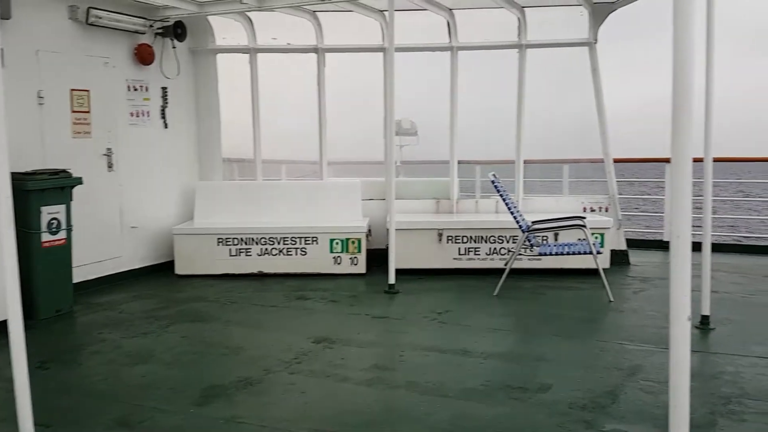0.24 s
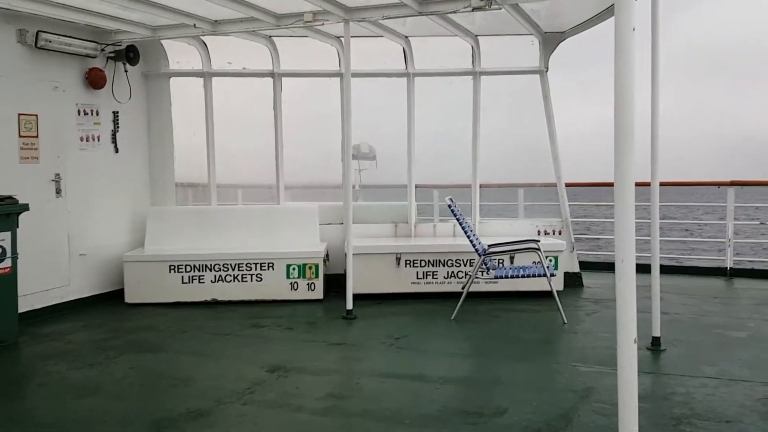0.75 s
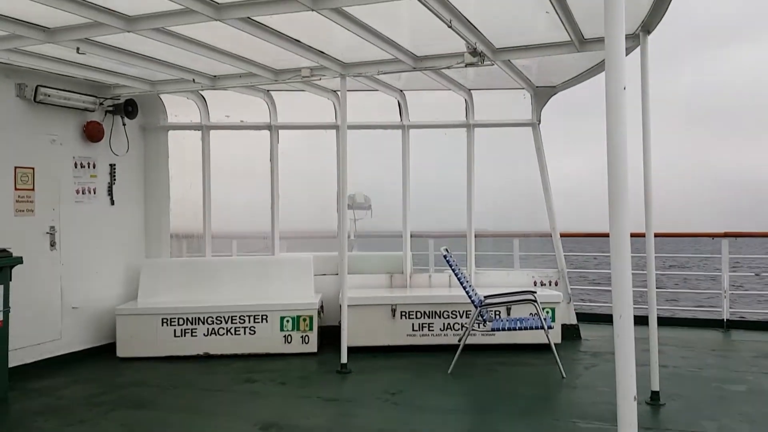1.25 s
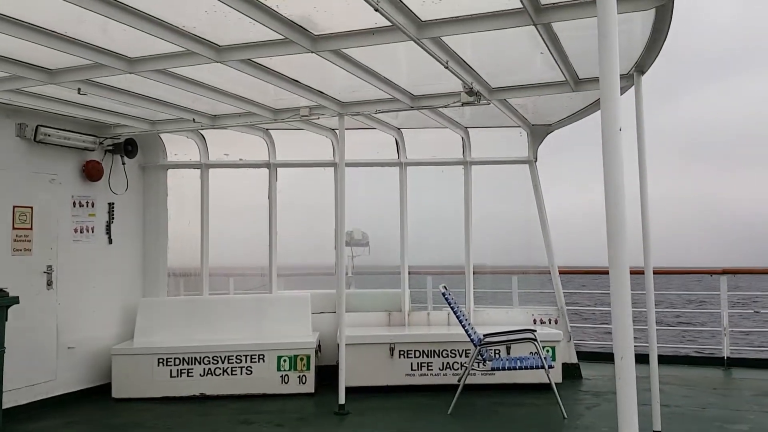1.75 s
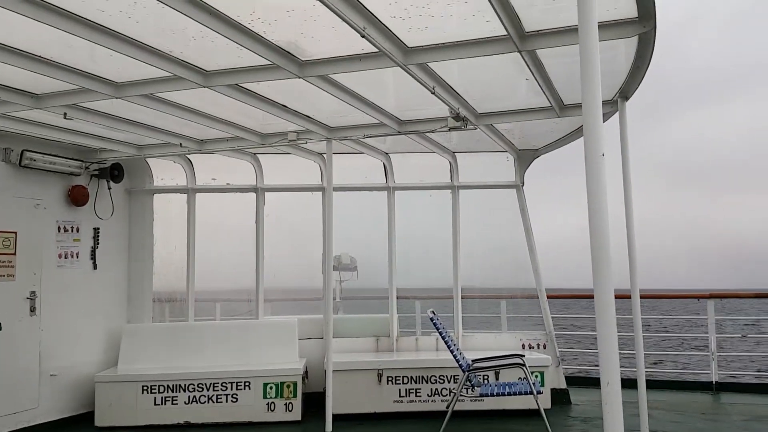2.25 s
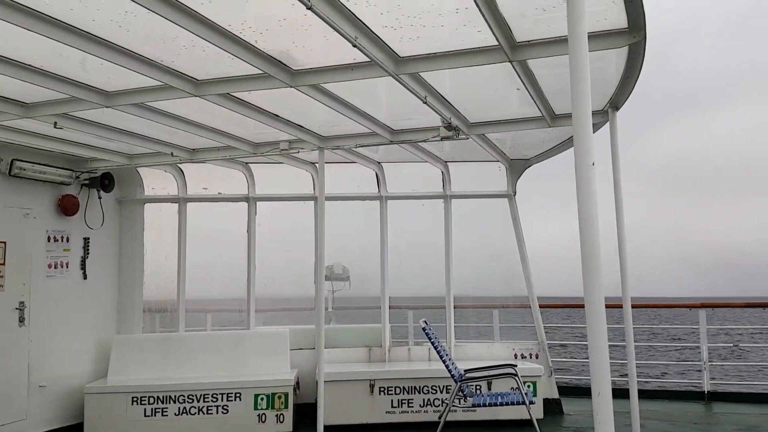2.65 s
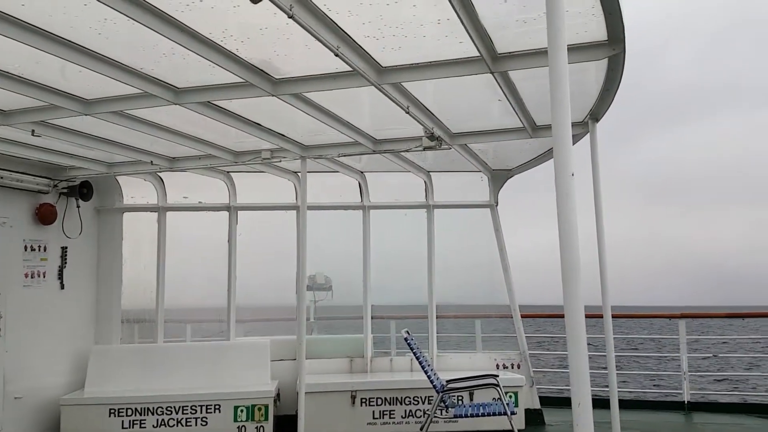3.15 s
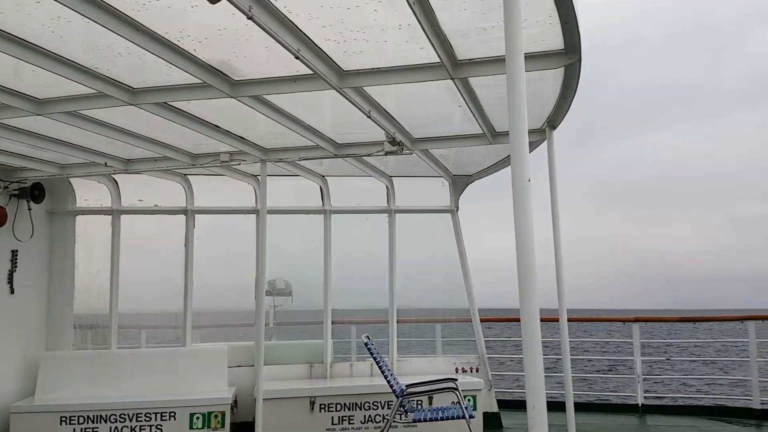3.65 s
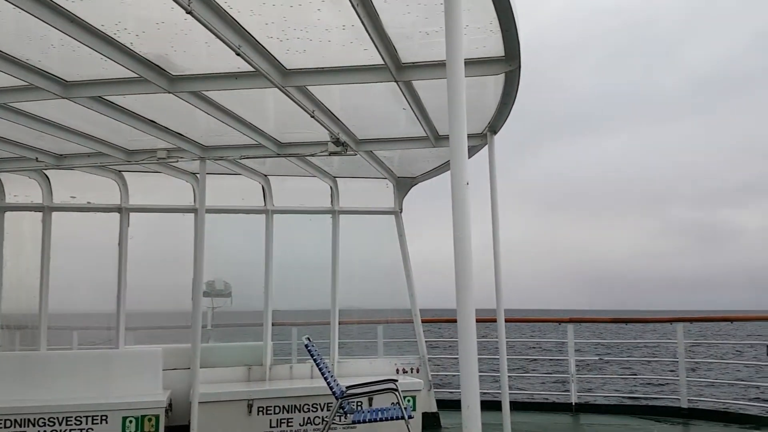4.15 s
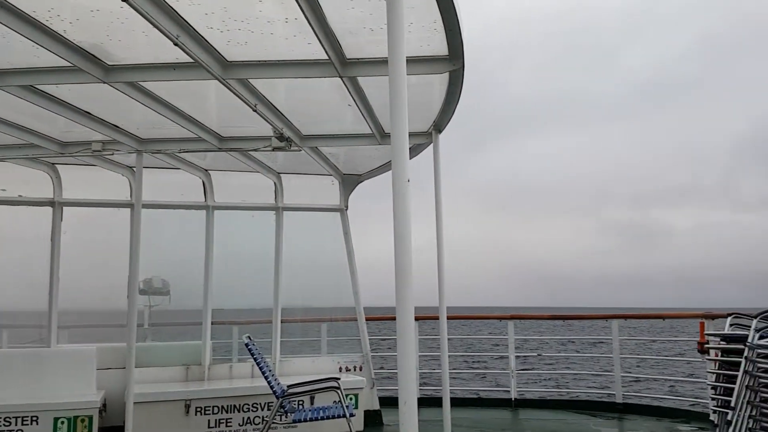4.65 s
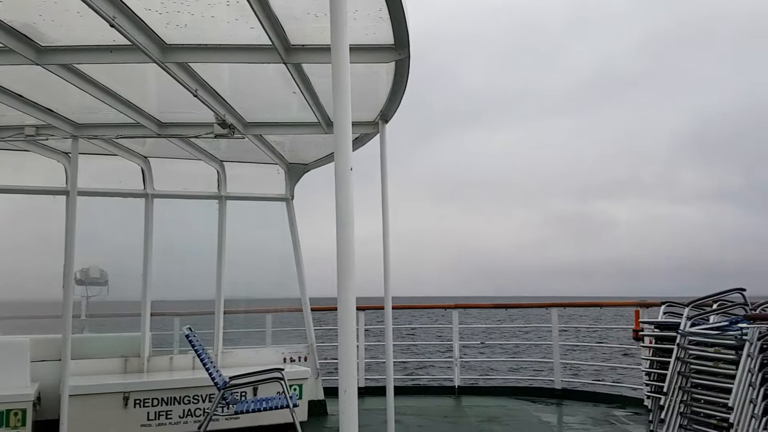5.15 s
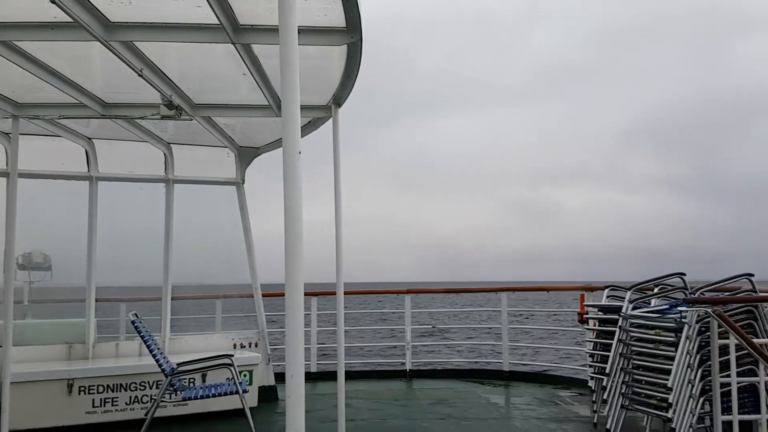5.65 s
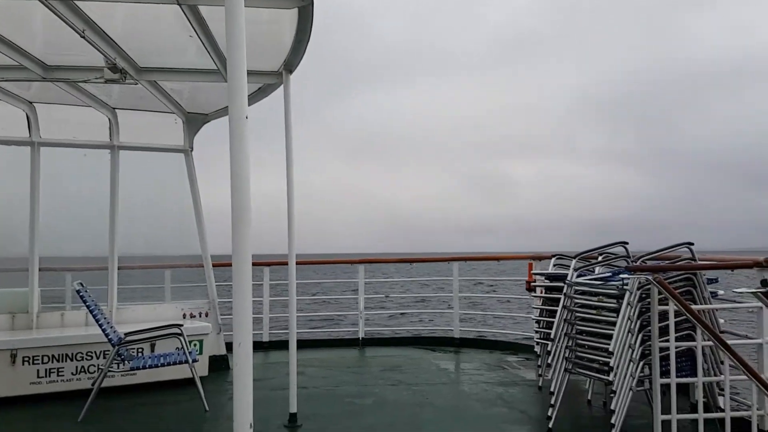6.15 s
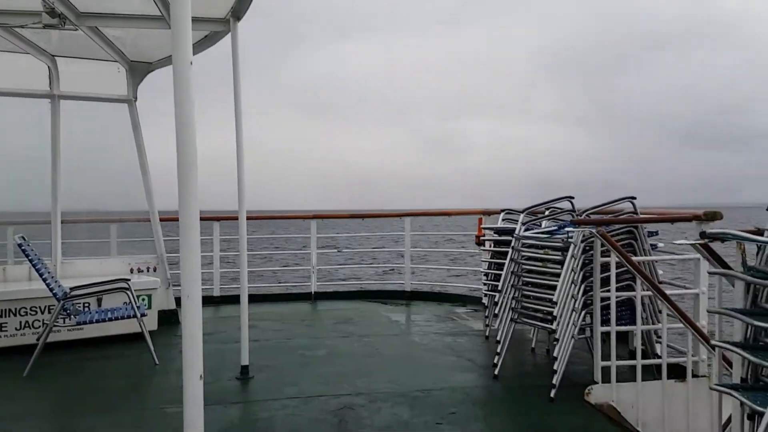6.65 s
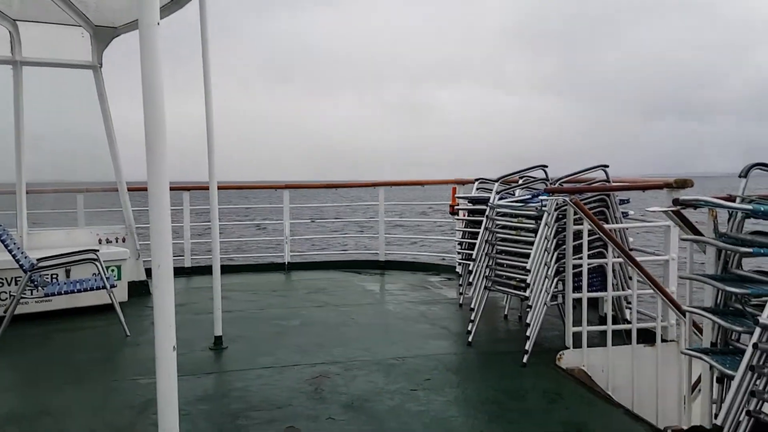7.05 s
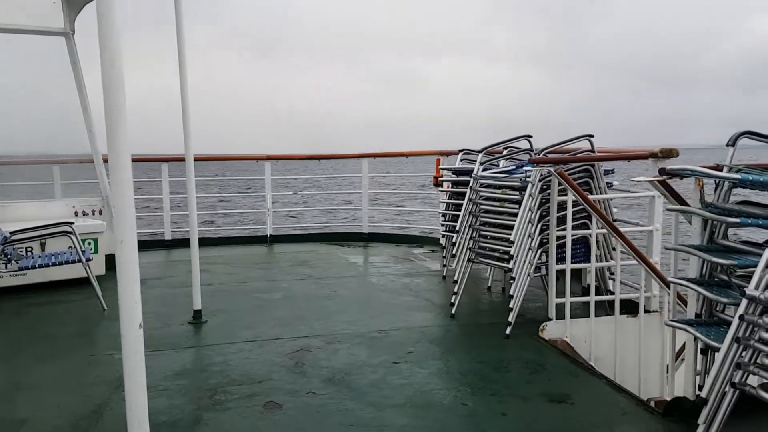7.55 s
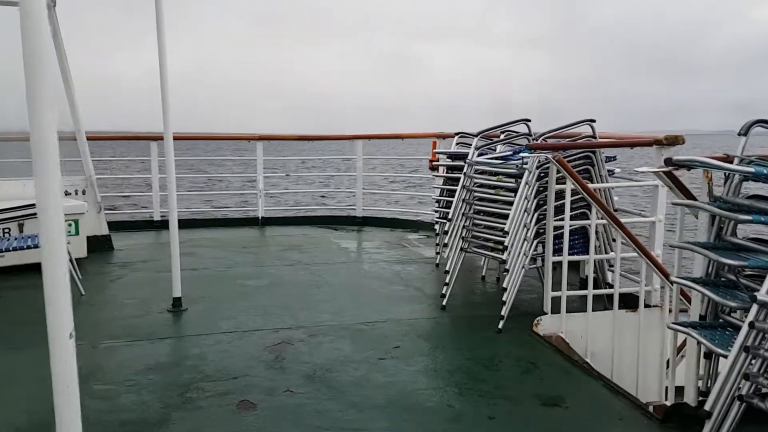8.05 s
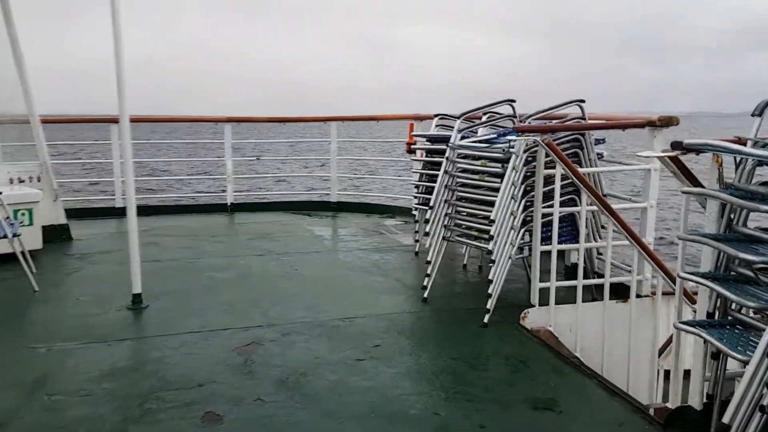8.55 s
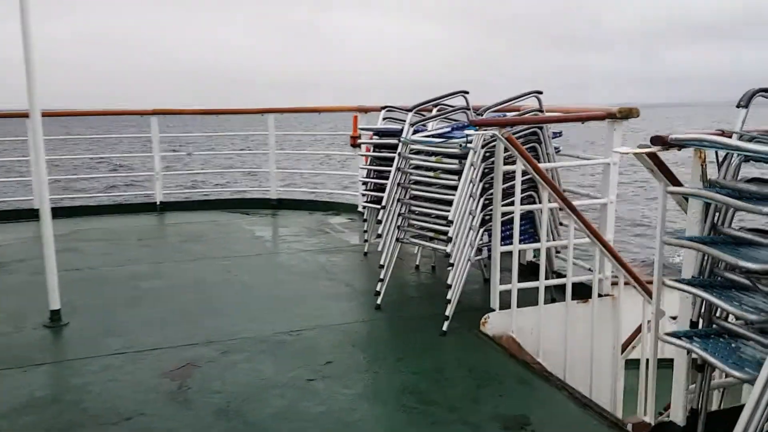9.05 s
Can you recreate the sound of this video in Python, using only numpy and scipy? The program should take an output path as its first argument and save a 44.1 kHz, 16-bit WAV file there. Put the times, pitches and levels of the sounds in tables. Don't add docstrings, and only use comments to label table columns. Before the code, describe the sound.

A large ship's diesel drones from start to finish, about nine and a half seconds: a dense, deep hum strongest around 60 to 80 hertz, with a buzzing upper layer, a slow beating throb and gentle swells as the listener moves beneath a roof. Around it lie a soft, wide rush of wind and ventilation, low wind buffeting, and faint wake and spray hiss growing slightly brighter. A barely audible scuff opens the scene. From 1.1 s, tiny dry, bright gear ticks occur irregularly, near and slightly right, until 5.1 s. A quick puff of wind slaps past at 4.8 s. More ticks come at 6.3 s and cluster from 7.1 to 7.6 s with faint dragging. At 8.45 s a rubber sole gives a very short, high, falling, chattering squeak and scuff; at 9.28 s a heel slips with a sharp little snap. The close stereo pickup has a short canopy reflection.

```python
import sys
import numpy as np
from scipy import signal
from scipy.fft import rfft, irfft, next_fast_len
from scipy.io import wavfile
from scipy.ndimage import uniform_filter1d, map_coordinates

SR = 44100
rng = np.random.default_rng(int(sys.argv[2]) if len(sys.argv) > 2 else 0)


def transcribe(signal):
    frames = np.atleast_2d(signal).T
    limited = np.clip(frames, -1, 1)
    pcm = np.round(limited * 32767).astype(np.int16)
    wavfile.write(sys.argv[1], SR, pcm)


def nominal_scale(level):
    x = np.asarray(level, float) / 20
    return 10 ** x


N = 410130
T = np.arange(N) / SR


def unit(x):
    return x / np.sqrt(np.mean(x ** 2) + 1e-20)


def along(points, hz):
    f, v = np.transpose(points)
    return np.interp(np.log(hz + 1), np.log(f + 1), v)


def curves(rows):
    s, *columns = np.transpose(rows)
    return [np.interp(T, s, column) for column in columns]


def wobble(rate_hz):
    knots = rng.standard_normal(int(N * rate_hz / SR) + 4)
    return map_coordinates(knots, [T * rate_hz])


def filtered(x, response):
    m = next_fast_len(N + SR // 2)
    return irfft(rfft(x, m) * response(np.fft.rfftfreq(m, 1 / SR)), m)[..., :N]


def rush(spectrum, patchy_db):
    z = signal.stft(rng.standard_normal((2, N)), nperseg=512)[2]
    field = rng.standard_normal(z.shape[1:])
    field = uniform_filter1d(field, size=6, axis=0)
    field = uniform_filter1d(field, size=14, axis=1)
    pair = signal.istft(z * nominal_scale(patchy_db * unit(field)), nperseg=512)[1][:, :N]
    closed = [(spectrum[0][0] / 2, -120), *spectrum, (spectrum[-1][0] * 2, -120)]
    return unit(filtered(pair, lambda hz: nominal_scale(along(closed, hz))))


def levels(layers, control_db):
    return [db + share * control_db + turn * (T - T.mean()) for db, share, turn in layers]


CYCLE_HZ = 3.2766
# multiple of the engine cycle, level in dB rms.
ENGINE_TONES = [(7, -39.0), (8, -39.3), (9, -48.9), (10, -40.3), (11, -38.6), (12, -41.7), (13, -44.1),
                (14, -30.9), (15, -35.3), (16, -46.8), (17, -29.4), (18, -31.0), (19, -27.2), (20, -24.9),
                (21, -34.4), (23, -34.7), (24, -23.3), (25, -30.7), (26, -29.4), (27, -31.6), (28, -34.6),
                (30, -44.5), (31, -41.0), (32, -44.8),
                (38, -41.0), (39, -39.9), (41, -37.4), (42, -28.2), (43, -37.5), (44, -31.6), (45, -29.3),
           (46, -39.8), (48, -32.2), (49, -38.9), (50, -37.2), (53, -39.7), (55, -44.2), (57, -43.8),
           (58, -41.1), (60, -38.2), (61, -31.9), (62, -45.1), (63, -39.5), (64, -43.8), (66, -36.7),
           (73, -41.4), (76, -45.2), (77, -40.5), (78, -42.6), (79, -41.0), (80, -46.7), (88, -45.5),
           (92, -47.5), (95, -46.2)]
# frequency in Hz, level in dB rms.
PUMPS = [(76.55, -29), (98.8, -39.5), (53.4, -44)]
# frequency in Hz, density in dB per Hz.
ROAR = [(20, -64.5), (38, -57), (56, -43.5), (65, -38), (71, -49), (78, -38.5), (104, -41.5), (113, -44),
        (147, -38.5), (172, -45), (200, -45.5), (230, -49), (260, -48), (340, -56)]
# time in seconds, lift of the funnel note in dB.
STANDING = [(0, 1.5), (.4, 1), (.8, -2.5), (1.2, 1), (1.9, 0), (2.4, -.5), (2.8, 0), (3.4, -3), (3.9, 1.5),
            (4.3, -1), (4.7, 1.5), (5.1, -1), (5.8, 1.5), (6.6, -2.5), (7.3, 3), (7.8, -1), (8.6, -2),
            (9.3, -3)]
# level in dB, share of the standing wave, change in dB per s while turning seaward.
DRONE = [
    (-24, 0.23, -0.24),
    (-17, 1.1, 0.12),
    (-20.5, -0.2, 0.16),
    (-24, .1, -0.32),
]


def engine():
    shaft = 2 * np.pi * CYCLE_HZ * T + 0.023 * wobble(1.2)
    tones = np.zeros((2, N))
    for order, db in ENGINE_TONES:
        waver = 0.0044 * order * wobble(2.5)
        for way, start in enumerate(rng.uniform(0, 2 * np.pi, size=2)):
            level = nominal_scale(db + 0.028 * order * wobble(1.5)) * np.sqrt(2)
            tones[way] += level * np.sin(order * shaft + waver + start)
    for hz, db in PUMPS:
        level = nominal_scale(db + 2.4 * wobble(0.96)) * np.sqrt(2)
        tones += level * np.sin(2 * np.pi * hz * T + 0.22 * wobble(1.7))
    drone = tones + nominal_scale(-22.0) * rush(ROAR, patchy_db=2.5)
    edges_hz = [0, 59, 108, 176, SR]
    bands = [filtered(drone, lambda hz: (hz >= lo) & (hz < hi)) for lo, hi in zip(edges_hz, edges_hz[1:])]
    bands_db = levels(DRONE, *curves(STANDING))
    return sum(nominal_scale(db) * unit(band) for db, band in zip(bands_db, bands))


# frequency in Hz, width in Hz, t60 in seconds.
GEAR_MODES = [
    (9960, 350, 0.032),
    (5500, 3500, .028),
    (8300, 900, .035),
    (13200, 4500, .032),
]
# start in seconds, knock in dB, ring in dB, upper modes in dB.
KNOCKS = [(1.1462, -61.5, -6, -9.5), (1.8083, -59, -6.5, -5), (2.0344, -66, -3, -1),
          (2.5468, -55.5, -0.5, -1.5), (2.9446, -60, -2.5, -8.5), (3.2846, -58.5, -5.5, -2),
          (4.479, -60.5, -3, -5), (4.7593, -57.5, 5, 2.5), (4.9372, -63.5, 2, -5), (5.1165, -58, 1.5, -8),
          (6.3026, -62.5, -8, -3), (6.4174, -60.5, -1, -2.5), (7.121, -64, 2.5, -5),
          (7.2011, -57.5, 2.5, 1), (7.4281, -59, -2, -0.5), (7.5566, -57, -1, -4),
          (7.595, -55.5, -3.5, -7.5), (7.6102, -60, -.3, -3)]


def ticks():
    body_db, lower_db = -2.5, -2.5
    pan_db = -1.2
    sides = nominal_scale([[pan_db / 2], [-pan_db / 2]])
    out, t = np.zeros((2, N + SR)), np.arange(2000) / SR
    for s, db, ring_db, upper_db in KNOCKS:
        for part_db, (hz, width_hz, t60_s) in zip([ring_db, body_db, lower_db, upper_db], GEAR_MODES):
            noise = [[.9, 0.49], [.9, -.45]] @ rng.standard_normal((2, len(t)))
            burst = nominal_scale(-60 * t / t60_s) * noise
            ring = signal.lfilter(*signal.iirpeak(hz, hz / width_hz, SR), burst)
            ring = ring * np.sqrt(SR / width_hz / 4)
            out[:, round(s * SR):][:, :len(t)] += nominal_scale(db + part_db + 1.5) * sides * ring
    return out[:, :N]


# time in seconds, pitch in Hz, level in dB.
SQUEAK = [
    (8.447, 7510, -74),
    (8.45, 7000, -51),
    (8.453, 5800, -47),
    (8.459, 6360, -49),
    (8.465, 4940, -49),
    (8.468, 6120, -59),
    (8.49, 6060, -65.5),
    (8.51, 6200, -66),
    (8.52, 6200, -81),
]
# start in seconds, starting pitch in Hz, length in seconds, level in dB, left-right in dB.
SLIPS = [
    (8.46, 5900, .011, -47, -9),
    (8.464, 9200, .006, -58, -6),
    (8.497, 5000, .009, -49, 2),
    (8.51, 6400, .006, -56, 4),
    (8.504, 4600, .007, -56, -5),
    (9.2785, 6400, .0015, -42, 0),
    (9.2785, 4700, .0015, -43, 0),
    (9.282, 5600, .003, -49, 0),
    (9.282, 12200, .002, -55, 0),
]
# start in seconds, level in dB, t60 in seconds.
SCUFFS = [
    (0, -61, 1.2),
    (7.2, -63, 1.5),
    (7.55, -63, 1.2),
    (8.451, -53.5, .3),
    (8.495, -57, .8),
    (9.278, -50, .012),
    (9.282, -51, .08),
]
# frequency in Hz, density in dB per Hz.
SOLE = [(2500, -16), (3800, -1), (5500, 0), (6800, -5), (9500, -13), (12000, -8), (15700, -13)]


def shoe():
    chatter_s, slip_fall_hz_per_s = 8.4665, 190000
    hz, db = curves(SQUEAK)
    rough = np.where(T < chatter_s, .08, .55)
    octave_db = np.where(T < chatter_s, -7, 1)
    turn = 2 * np.pi * np.cumsum(hz * (1 + .015 * rough * wobble(300))) / SR
    level = nominal_scale(db + 9 * rough * wobble(400)) * (T > SQUEAK[0][0]) * (T < SQUEAK[-1][0])
    tone = nominal_scale([[2], [-4.5]]) * np.sin(turn)
    octave = nominal_scale(octave_db) * nominal_scale([[-3], [3]]) * np.sin(2 * turn)
    out = level * (tone + octave)
    for s, from_hz, length_s, db, pan_db in SLIPS:
        u = np.clip((T - s) / length_s, 0, 1)
        glide = 2 * np.pi * length_s * (from_hz * u - slip_fall_hz_per_s * length_s * u * u / 2)
        sides = nominal_scale([[db + pan_db / 2], [db - pan_db / 2]])
        out += sides * np.sin(np.pi * u) * nominal_scale(2.5 * wobble(700)) * np.sin(glide)
    scrape = sum(nominal_scale(db - 60 * np.maximum(T - s, 0) / t60_s) * (T > s) for s, db, t60_s in SCUFFS)
    return out + scrape * rush(SOLE, patchy_db=2.5)


# frequency in Hz, density in dB per Hz.
WIND = [(180, -32.5), (300, -4.5), (330, -10), (360, -7.5), (390, -8.5), (430, -8.5), (500, -13),
        (600, -14), (720, -14.5), (800, -17.5), (900, -20.5), (1300, -29.5), (1700, -58)]
# frequency in Hz, density in dB per Hz.
VENTS = [(590, -30), (1000, -1.5), (1340, -3.5), (1690, -3.5), (2190, -7), (3360, -21), (4370, -48.5),
         (7390, -120)]
# frequency in Hz, density in dB per Hz.
WAKE = [(3000, -6), (3600, -2), (4000, -3), (4500, -2.5), (5000, -6.5), (5500, -9), (6500, -11.5),
        (7200, -17)]
# frequency in Hz, density in dB per Hz.
SPRAY = [(6500, -8), (7200, -3), (7700, -3), (8500, -1), (9200, -4), (10000, -6), (12000, -5),
         (13000, -7.5), (15500, -7.5)]
# frequency in Hz, level in dB.
WHINE = [(11902, -94), (12106, -96.5), (12004, -89.5)]
# time in seconds, wind strength in dB.
GUSTS = [(0.0, -39.5), (0.65, -39), (1.16, -40), (2.35, -39), (2.98, -38.5), (3.39, -40.5), (3.88, -37),
         (4.07, -40), (4.43, -40), (4.84, -41), (5.07, -41), (5.36, -41), (5.77, -42), (6.03, -40),
         (6.42, -43), (6.63, -41), (8.34, -41), (9.3, -41.5)]
# level in dB, share of the gusts, change in dB per s while turning seaward.
OUTLETS = [
    (-35, 1.01, 0.08),
    (-42, 0.98, 0.07),
    (-60.5, 0.55, 0.2),
    (-65.5, .3, 0.24),
]


def air():
    puff_s, puff_width_s, puff_db = 4.84, .025, 6
    strength_db, = curves(GUSTS)
    wind_db, vents_db, wake_db, spray_db = levels(OUTLETS, strength_db - strength_db.mean())
    gust = wobble(6)
    slap_db = puff_db * np.exp(-((T - puff_s) / puff_width_s) ** 2)
    wind = nominal_scale(wind_db + slap_db + .5 * gust + 0.24 * wobble(12)) * rush(WIND, patchy_db=0.8)
    vents = nominal_scale(vents_db + 0.49 * gust + 0.26 * wobble(16)) * rush(VENTS, patchy_db=0.87)
    wake = nominal_scale(wake_db + 0.32 * gust + 0.47 * wobble(10)) * rush(WAKE, patchy_db=1.16)
    spray = nominal_scale(spray_db + .3 * gust + .4 * wobble(9)) * rush(SPRAY, patchy_db=0.7)
    whine = sum(nominal_scale(db + 3 * wobble(1.5)) * np.sin(2 * np.pi * hz * T + .6 * wobble(30)) for hz, db in WHINE)
    return wind + vents + wake + spray + whine


# frequency in Hz, density in dB per Hz.
BUFFET = [(15, -12), (25, -4), (40, -1), (60, -7.5), (100, -20)]


def buffet():
    return nominal_scale(-34 + 3 * wobble(5)) * rush(BUFFET, patchy_db=0.5)


def canopy(x):
    t = np.arange(SR // 4) / SR
    tail = nominal_scale(-60 * t / .22) * (t > .006) * rng.standard_normal((2, len(t)))
    return signal.fftconvolve(x, tail / np.linalg.norm(tail[0]), axes=1)[:, :N]


# frequency in Hz, likeness 0-1.
ALIKE = [(40, 0.97), (100, 1), (344, 0.93), (516, 0.6), (860, .32), (1380, 0.64), (2070, .13), (2400, .36),
         (3050, 0.3), (3600, .33), (4200, 0), (5300, 0), (7000, 0.04), (8200, 0)]
# frequency in Hz, phase lead in radians.
LEAD = [(0, 0), (100, .13), (344, 0.47), (690, 0.74), (1030, 2.5), (1380, 3), (1900, 3.5), (2240, 6.5),
        (2760, 6.5), (3400, 8), (4000, 11), (4500, 12.6), (5200, 15.5), (8200, 14)]
# frequency in Hz, left-right in dB.
LEAN = [(60, 0.5), (340, -0.5), (800, -1), (1300, -3), (2000, -3.5), (3200, -1), (4500, 0.5), (5200, -3),
        (6500, -1), (8300, -5.5), (10000, -2.5), (15000, -1)]


def ports(shared, own):
    turn_lag_s_per_s = 2.3e-5
    like = lambda hz: np.clip(along(ALIKE, hz), 0, 1)
    left = filtered(shared, lambda hz: nominal_scale(along(LEAN, hz) / 2))
    right = filtered(shared, lambda hz: like(hz) * np.exp(-1j * along(LEAD, hz)) * nominal_scale(-along(LEAN, hz) / 2))
    heard_s = T + turn_lag_s_per_s * (T - T.mean())
    right = map_coordinates(right, [heard_s * SR], order=5, mode="nearest")
    right += filtered(own, lambda hz: np.sqrt(1 - like(hz) ** 2) * nominal_scale(-along(LEAN, hz) / 2))
    return np.array([left, right])


def scene():
    far = ports(*(engine() + air() + buffet()))
    near = ticks() + shoe()
    return far + near + nominal_scale(-6.0) * canopy(near)


def band_limit(x):
    return signal.sosfilt(signal.butter(12, 15745, fs=SR, output="sos"), x)


def record(dry):
    rounded = dry / (1 + np.abs(dry / .8) ** 4) ** (1 / 4)
    return band_limit(rounded)


dry = scene()
out = record(dry)
transcribe(out)
```